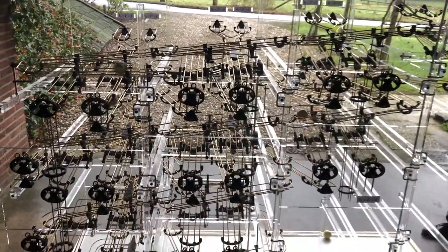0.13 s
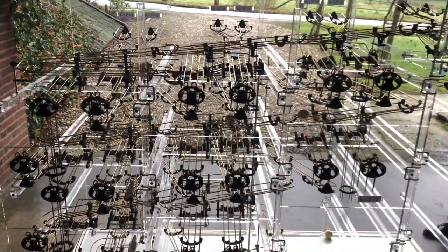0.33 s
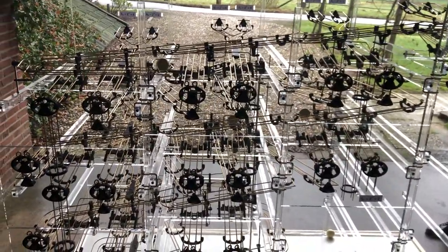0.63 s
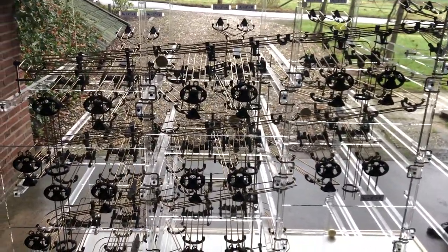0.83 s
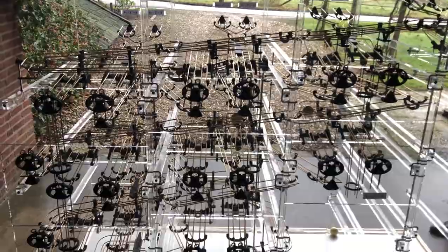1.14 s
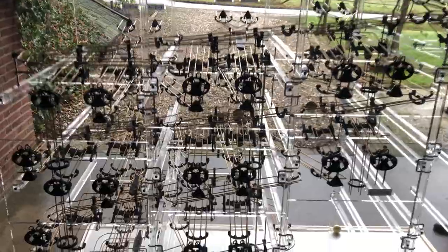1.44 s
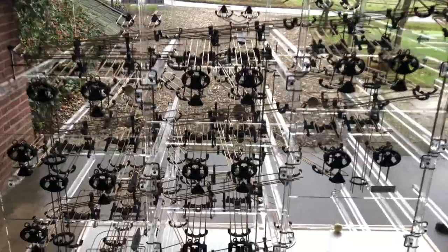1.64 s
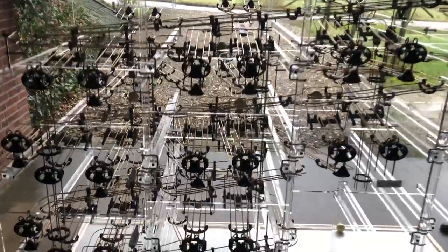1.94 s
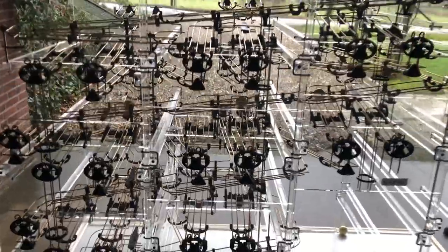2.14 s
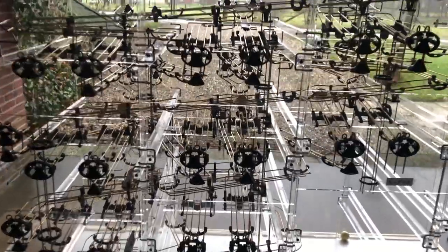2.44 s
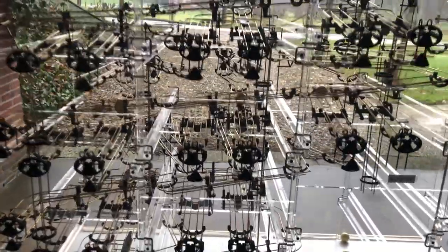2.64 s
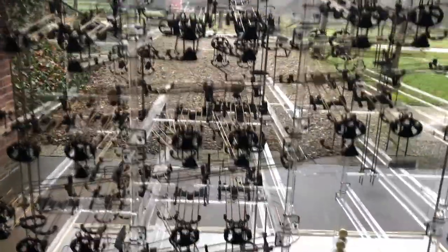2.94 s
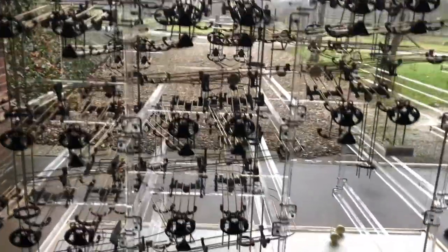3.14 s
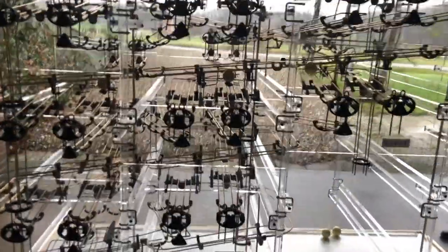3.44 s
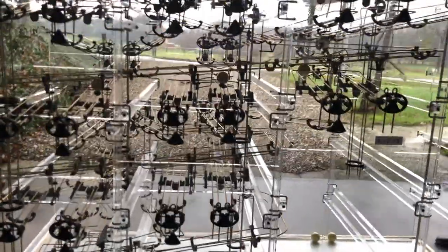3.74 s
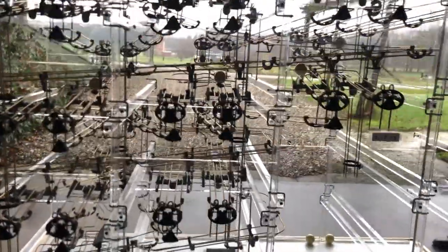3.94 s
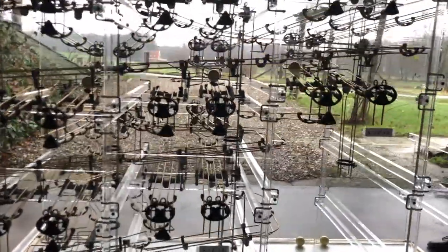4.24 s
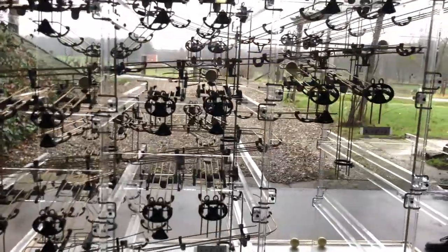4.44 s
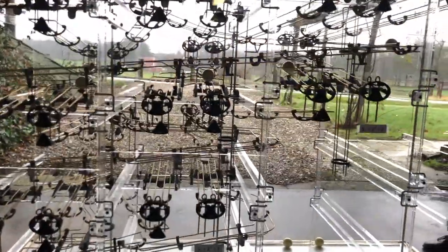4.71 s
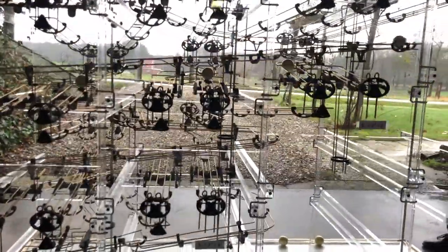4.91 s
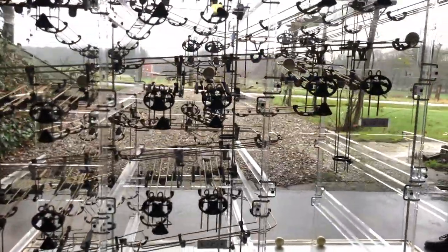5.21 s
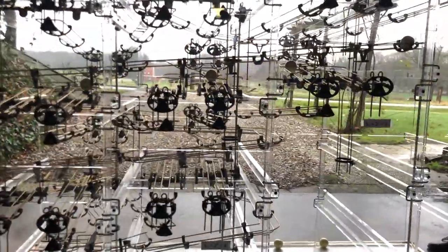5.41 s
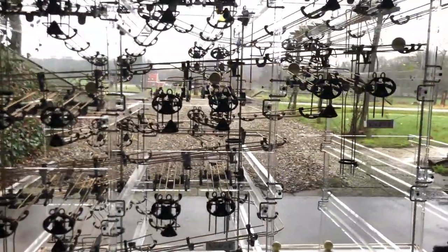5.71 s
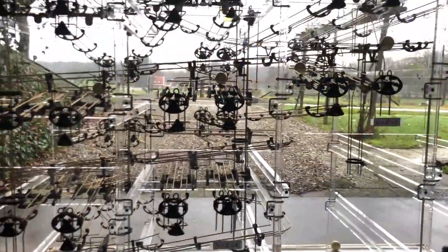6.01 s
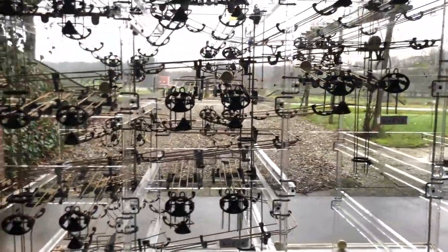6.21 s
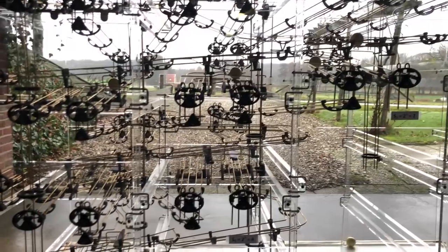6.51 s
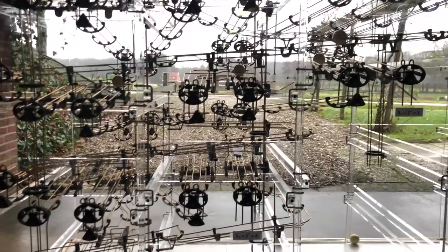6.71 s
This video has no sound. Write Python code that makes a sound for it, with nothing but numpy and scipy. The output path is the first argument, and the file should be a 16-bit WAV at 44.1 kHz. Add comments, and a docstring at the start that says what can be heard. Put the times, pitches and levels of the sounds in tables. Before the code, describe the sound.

Inside a large ball machine between glass panes, heard close, steel balls rumble low and unevenly along rails over faint, steady outdoor rumble and hiss. Small clacks and light double-rebounding switch ticks begin at once. At 0.47 s a heavy ball lands with a hard steel crack and a deep frame boom, immediately followed by another at 0.51 with a ringing note; a third cracks and booms at 0.81, a softer one at 0.94. A bright tick at 0.96 starts a rattling run of switches, with a sharper clack near 1.8, fading by 3.1. The rumble drops away. A hollow knock with brief ringing stands out at 3.6, then near quiet until a clack at 4.45. A small cluster of clacks and muted rings comes at 5.1 to 5.35; very faint clicks and dull knocks follow from 6.2, with a crisper click at 6.7. Each contact leaves a short, hard-walled echo.

```python
"""A large kinetic ball machine between glass panes: balls rumble along steel rails over faint outdoor noise.
Scattered clacks come from the start, and rows of small switches tick through the first three seconds.
Heavy landings boom through the frame's modes within the first second, some with a hard crack of steel.
Struck levers ring on as narrow bands of noise, and later dull knocks join the clacks.
Each contact is a burst of filtered noise with a decaying echo in the hard-walled enclosure."""
import sys
import numpy as np
from scipy import signal
from scipy.fft import rfft, irfft, next_fast_len
from scipy.io import wavfile
from scipy.ndimage import uniform_filter1d, minimum_filter1d, map_coordinates

SR = 44100
rng = np.random.default_rng(int(sys.argv[2]) if len(sys.argv) > 2 else 0)


def put_to_file(sound):
    """Save the sound as 16-bit audio at rate SR, in the file named by the first command-line argument."""
    columns = np.atleast_2d(sound).T  # one column per channel
    safe = np.clip(columns, -1, 1)
    whole_steps = np.round(safe * 32767)
    wavfile.write(sys.argv[1], SR, whole_steps.astype(np.int16))


N = 302526
TOP_HZ = 15850  # upper band limit

# modes of the frame and panes: (frequency [Hz], relative level [dB], t60 [s])
FRAME_MODES = [(139.8, -1, 0.44), (153.5, 12, 0.47), (185.4, 6.5, 0.46), (198.2, 3, 0.95), (266.6, 5, 0.67),
               (276, -0.5, 0.97), (313.3, 0, 0.71), (371, -8, 0.96), (469, -5, 0.83), (571, 6.5, 0.33),
               (632, -2.5, 0.51), (740, -5.5, 0.82), (821, 8, 0.21), (980, -18, 1.7), (1075, -3.5, 0.282),
               (1080, -14, 0.5), (1130, -29.5, 0.51), (1290, -30, 0.26), (1178, -3, 0.23), (1584, -3, 0.32),
               (1740, -30, 0.57)]


def amp(db):
    """Amplitude of a level in dB."""
    return 10 ** (np.asarray(db) / 20)


def unit(x):
    """Scale x to an RMS of one."""
    return x / np.sqrt(np.mean(x ** 2) + 1e-20)


def along(points, hz):
    """Interpolate (frequency [Hz], value) points on a log frequency axis."""
    point_hz, values = np.transpose(points)
    return np.interp(np.log(hz + 1), np.log(point_hz), values)


def wobble(rate):
    """A smooth random curve, rate knots a second."""
    knots = rng.standard_normal(int(N * rate / SR) + 4)
    return map_coordinates(knots, [np.arange(N) * rate / SR])


def filtered(x, response):
    """Filter x by a response given as a function of frequency."""
    padded = next_fast_len(x.shape[-1] + 4096)
    spectrum = rfft(x, padded) * response(np.fft.rfftfreq(padded, 1 / SR))
    return irfft(spectrum, padded)[..., :x.shape[-1]]


def add(track, s, sound):
    """Mix a sound into a track from time s on."""
    part = track[..., max(round(s * SR), 0):][..., :sound.shape[-1]]
    part += sound[..., :part.shape[-1]]


def rolling():
    """Balls rumble unevenly along the rails, which feed the frame's modes."""
    # balls under way: (time [s], level before the overall trim [dB])
    roll_levels = [(0.0, -39), (0.11, -41), (0.4, -35.5), (0.59, -31), (0.99, -46), (1.28, -44.5),
                   (1.68, -49), (2.5, -39.5), (2.96, -47), (3.65, -47.5), (4.01, -58.5), (4.77, -52.5),
                   (5.18, -60), (5.35, -48), (5.98, -55.5), (6.86, -45)]
    # rumble of the rails: (frequency [Hz], relative level per Hz [dB])
    rail_spectrum = [(25, -42.5), (60, -7.5), (90, 2.5), (140, -3.5), (230, 2), (380, -9.5), (700, -13),
                     (1100, -17.5), (2500, -23), (5000, -33), (15000, -53.5)]
    trim_db = -2.5

    def response(f):
        modes = sum(amp(db) / (1 + ((f - hz) / 5) ** 2) for hz, db, _ in FRAME_MODES)
        return amp(along(rail_spectrum, f)) * (1 + 0.5 * modes)

    rumble = unit(filtered(rng.standard_normal(N), response))
    level_db = np.interp(np.arange(N) / SR, *np.transpose(roll_levels))
    return rumble * amp(trim_db + level_db + 0.39 * wobble(25))


def outdoors():
    """Steady distant rumble and hiss: noise with a fixed spectrum."""
    # outdoor background: (frequency [Hz], relative level per Hz [dB])
    air_spectrum = [(12, -24.5), (20, -11.5), (59, 3.5), (106, -3.5), (137, -2.5), (252, -12.5), (282, -8),
                    (352, -8), (491, -10), (667, -20), (1040, -10.5), (1230, -16.5), (2610, -21),
                    (15500, -46.5)]
    noise = filtered(rng.standard_normal(N), lambda f: amp(along(air_spectrum, f)))
    return amp(-55.5) * unit(noise)


def bending(hz, lag_s):
    """Bending waves carry the treble ahead of the bass; lag_s is the delay at 1 kHz."""
    return np.exp(-4j * np.pi * lag_s * np.sqrt(1000 * hz))


def contact(levels_db, body, burst, burst_s, rise_s, uneven_db, mode_gap_hz, lag_s):
    """One blow: a short burst of dense steel modes, then the echo between the panes."""
    # centres of thud, knock, clack and tick: (frequency [Hz])
    contact_hz = [250, 1000, 3300, 10000]
    # decay of the echo: (frequency [Hz], t60 [s])
    enclosure_t60 = [(100, 1.0), (260, 0.58), (1000, 0.56), (3300, .62), (10000, 0.46)]
    # first burst over the echo, before the burst factor: (frequency [Hz], relative strength [ratio])
    early_strength = [(250, 0.11), (1000, 0.92), (3300, 2.64), (10000, 3)]

    hz, t, noise = signal.stft(rng.standard_normal((2, SR)), SR, nperseg=256)
    echo = amp(-60 * t / along(enclosure_t60, hz)[:, None])
    first_burst = burst * along(early_strength, hz)[:, None] * np.exp(-t / burst_s)
    sound = signal.istft(noise * echo * (1 + first_burst), SR, nperseg=256)[1][:, :SR]

    # a soft blow goes on falling through the top octave
    clack_db, tick_db = levels_db[2:]
    top_db = tick_db + 0.67 * (tick_db - clack_db) - 5.0
    blow = [*zip(contact_hz, levels_db), (TOP_HZ, top_db)]
    peaks = rng.standard_normal(1024)

    def response(f):
        # every struck part has resonances of its own, weaker in the bass
        own_peaks = np.interp(f / mode_gap_hz, np.arange(len(peaks)), peaks)
        own_db = uneven_db * f / (f + 450) * own_peaks
        return amp(along(body, f) + along(blow, f) + own_db) * bending(f, lag_s)

    # each contact swells in over a few milliseconds
    rise = (1 - np.exp(-np.arange(SR) / SR / rise_s)) ** 2
    return filtered(sound, response) * rise


def colour(level_db, edge_db, thud_db, clack_db):
    """Thud, knock, clack and tick levels: a harder contact has more treble and less bass."""
    soft_thud = 0.061  # dB of bass gained for each dB of edge lost
    return [level_db + thud_db - soft_thud * edge_db, level_db, level_db + clack_db, level_db + edge_db]


def switch(levels_db, burst, rise_s):
    """One contact with a small steel switch, its modes excited as a noise burst."""
    # a struck switch: (frequency [Hz], relative level per Hz [dB])
    switch_body = [(25, -52), (75, 3), (110, -4.5), (180, -4), (380, -4), (750, -5), (1250, -6.5),
                   (1800, -10), (3400, -8.5), (5200, -12.5), (7000, -13), (11000, -15.5), (13500, -13),
                   (15500, -16.5)]
    return amp(18.5) * contact(levels_db, switch_body, burst, burst_s=0.0086, rise_s=rise_s,
                               uneven_db=4.0, mode_gap_hz=70.3, lag_s=0.001225)


def switches():
    """Single clacks, from soft knocks to hard clicks as the edge of the contact grows."""
    # balls meeting levers and rail ends: (time [s], relative level [dB], edge: treble over the body [dB])
    clack_events = [(0.0, -49.5, -8), (.023, -38, -11), (.106, -41.5, -3.5), (.309, -42, -11),
                    (.357, -45, 1), (.436, -43.5, -13.5), (.842, -39, -7.5), (1.247, -44, -2),
                    (1.383, -50, -4.5), (1.492, -42, -20.5), (1.689, -50.5, -18), (1.725, -52.5, -13),
                    (1.797, -37, -10.5), (1.908, -47, -12), (2.167, -43.5, -35), (2.241, -47, -0.5),
                    (2.291, -40, -31), (2.417, -45.5, -6.5), (2.47, -52.5, -5), (2.593, -48, -12),
                    (2.713, -42.5, -9), (3.025, -49, -10.5), (3.355, -42.5, -11.5), (3.553, -49, -11.5),
                    (4.441, -47, -12.5), (4.609, -52, -10.5), (4.647, -54, -23), (5.117, -51.5, -11),
                    (5.138, -47, -8), (5.181, -49, -11), (5.242, -46.5, -13.5), (5.344, -50.5, -12),
                    (6.212, -54.5, -4), (6.279, -54.5, -10), (6.317, -53.5, -12), (6.624, -55, -4),
                    (6.717, -45, -4), (6.758, -65, -16), (6.802, -52, -24)]
    out = np.zeros((2, N))
    for s, level_db, edge_db in clack_events:
        levels_db = colour(level_db, edge_db, thud_db=0.5, clack_db=-1.5)
        add(out, s, switch(levels_db, burst=0.64, rise_s=0.0042))
    return out


def ticks():
    """Light, bright contacts of one colour; each switch chatters twice as it settles."""
    # a ball tripping along a row of small switches: (time [s], relative level [dB])
    tick_events = [(0.0424, -32), (0.2189, -33.5), (0.958, -24.5), (1.1282, -29.5), (1.2005, -37.5),
                   (1.2837, -38), (1.3473, -36), (1.4485, -42.5), (1.5507, -40.5), (1.63, -52.5),
                   (1.8237, -29), (1.8855, -33), (1.974, -39), (2.05, -45), (2.1207, -35.5), (2.2229, -32),
                   (2.321, -37.5), (2.6723, -40), (2.7843, -40), (2.834, -45), (2.888, -43.5),
                   (2.9365, -54), (2.9879, -46.5), (3.0937, -50)]
    # colour of every tick: (thud, knock, clack, tick relative levels [dB])
    tick_colour = [-11.5, -16, -17, -16]
    lead_s = .003  # each contact starts this far ahead of its listed time
    chatter_s, chatter_db = .03, -8.5  # mean gap, level of each rebound over the last
    out = np.zeros((2, N))
    for s, db in tick_events:
        tick = amp(db) * switch(tick_colour, burst=1.7, rise_s=0.0043)
        gaps_s = chatter_s * rng.uniform(.5, 1.5, size=2)
        delays_s = np.cumsum([0, *gaps_s])
        for rebound, delay_s in enumerate(delays_s):
            add(out, s - lead_s + delay_s, amp(rebound * chatter_db) * tick)
    return out


def frame(thud_db, scatter_db):
    """The frame's modes as decaying sines, shaken at new strengths by each blow."""
    t = np.arange(SR) / SR
    hz, db, t60 = np.transpose(FRAME_MODES)[:, :, None]
    size = amp(thud_db + db + scatter_db * rng.standard_normal(hz.shape))
    phase = 2 * np.pi * rng.random(hz.shape)
    modes = size * amp(-60 * t / t60) * np.sin(2 * np.pi * hz * t + phase)
    return modes.sum(0) * (1 - np.exp(-t / 0.0017))


def drops():
    """Heavy landings: a contact's noise burst, then the whole frame booming in its modes."""
    # heavy balls landing on the frame:
    # (time [s], relative level [dB], edge: treble over the body [dB], first burst [ratio])
    landings = [(0.468, -19.5, -13.5, 1.35), (0.51, -20.5, -17.5, .8), (0.815, -19, -23.5, 1.4),
                (0.936, -27, -24, 1.5)]
    # the struck frame: (frequency [Hz], relative level per Hz [dB])
    drop_body = [(25, -49.5), (60, -17), (100, -9), (150, -6), (260, -2.5), (400, -7), (750, -2),
                 (1300, -3.5), (1900, -8.5), (3500, -11.5), (5200, -11.5), (7000, -13), (10000, -16),
                 (15500, -21.5)]
    boom_db = -8.5  # the frame's modes against the level of a landing
    out = np.zeros((2, N))
    for s, level_db, edge_db, burst in landings:
        levels_db = colour(level_db, edge_db, thud_db=1.5, clack_db=-1)
        landing = contact(levels_db, drop_body, burst, burst_s=0.0059, rise_s=0.0038,
                          uneven_db=0.5, mode_gap_hz=22.28, lag_s=.0028)
        add(out, s, amp(17.5) * landing)
        add(out[0], s + 0.00379, frame(level_db + boom_db, scatter_db=0.5))
    return out


def crack(peak_s):
    """The brief hard ring of ball and steel: shaped noise that swells to peak_s and dies away."""
    # steel on steel: (frequency [Hz], relative level [dB])
    crack_spectrum = [(900, -32), (2000, -7.5), (3000, -6.5), (3550, 8), (4200, -10), (5200, 0.5),
                      (6300, -15), (9000, -21.5), (15500, -38)]
    u = np.arange(SR // 10) / SR / peak_s
    noise = rng.standard_normal((2, len(u)))
    ring = unit(filtered(noise, lambda f: amp(along(crack_spectrum, f))))
    return ring * u * np.exp((1 - u ** 2) / 2)


def cracks():
    """Steel striking steel squarely cracks; the treble of the crack is wide."""
    # square hits: (time [s], level [dB])
    square_hits = [(.468, -16), (0.814, -17), (1.493, -47.5), (1.691, -42), (1.799, -33)]
    # side level of the cracks: (frequency [Hz], side level [dB])
    crack_width = [(2500, -48.5), (4500, -12.5), (9000, -4.5)]
    out = np.zeros((2, N))
    for s, db in square_hits:
        add(out, s, amp(db) * crack(peak_s=0.0059))
    mid, side = out
    return np.array([mid, filtered(side, lambda f: amp(along(crack_width, f)))])


def levers():
    """A struck lever, rail or bar rings on, the low ones longest; its reflections blur the note."""
    # parts left ringing after a strike: (time [s], frequency [Hz], level [dB])
    lever_notes = [(.47, 160, -25), (.47, 256, -26), (.51, 1280, -20), (.817, 199, -28), (1.495, 3640, -41),
                   (2.294, 797, -40), (3.598, 346, -44.5), (3.598, 1980, -43), (4.445, 1400, -45.5),
                   (5.143, 7530, -47), (5.245, 5800, -47.5), (5.348, 593, -45.5), (5.347, 1034, -44.5),
                   (5.348, 7370, -50.5), (6.215, 14100, -56), (6.631, 10250, -56), (6.722, 14500, -50)]
    out, t = np.zeros(N), np.arange(SR) / SR
    for s, hz, db in lever_notes:
        width_hz = 6 + .016 * hz  # a fixed part plus a share of the pitch
        t60 = .19 + 60 / hz  # seconds: a fixed time plus 60 cycles
        noise = rng.standard_normal(len(t))
        note = unit(filtered(noise, lambda f: 1 / (1 + ((f - hz) / width_hz) ** 2)))
        add(out, s, note * amp(db - 60 * t / t60) * (1 - np.exp(-t / 0.0033)))
    return out


def knocks():
    """Dull, hollow knocks of balls against their stops: soft contacts that hardly reach the treble."""
    # balls meeting their stops: (time [s], relative level [dB])
    knock_events = [(2.551, -47), (2.596, -52.5), (3.491, -48), (3.594, -38), (5.342, -48.5),
                    (6.281, -54.5), (6.315, -48.5), (6.722, -48)]
    # a struck stop: (frequency [Hz], relative level per Hz [dB])
    stop_body = [(25, -40), (90, 1.5), (200, -2), (360, 3.5), (600, -3), (1100, -7), (2200, -12),
                 (3400, -16), (5200, -26.5), (15500, -55)]
    out = np.zeros((2, N))
    for s, db in knock_events:
        # thud, knock, clack and tick are equal here, so the stop sets the colour
        knock = contact(np.zeros(4), stop_body, burst=0.73, burst_s=0.011, rise_s=0.0019,
                        uneven_db=3.0, mode_gap_hz=49.8, lag_s=0.001214)
        add(out, s, amp(db + 18.5) * knock)
    return out


def scene():
    """Mix all sources in mid and side; the side channel carries only treble of contacts and cracks."""
    # side level of the contacts' treble: (frequency [Hz], side level [dB])
    contact_side_level = [(2500, -95), (4200, -48), (8000, -27.5), (15000, -9.5)]
    background = rolling() + outdoors()
    contact_mid, contact_side = switches() + ticks() + drops() + knocks()
    crack_mid, crack_side = cracks()
    mid = background + contact_mid + crack_mid + levers()
    side = crack_side + filtered(contact_side, lambda f: amp(along(contact_side_level, f)))
    return np.array([mid + side, mid - side])


def record(dry):
    """A limiter holds down the highest peaks of both channels; nothing is kept above the band limit."""
    needed = np.minimum(1, .62 / (np.abs(dry).max(0) + 1e-9))
    # hold the lowest gain over 130 samples (3 ms), then smooth it
    gain = uniform_filter1d(minimum_filter1d(needed, size=130), size=130)
    return filtered(dry * gain, lambda f: f < TOP_HZ)


dry = scene()
out = record(dry)
put_to_file(out)
```